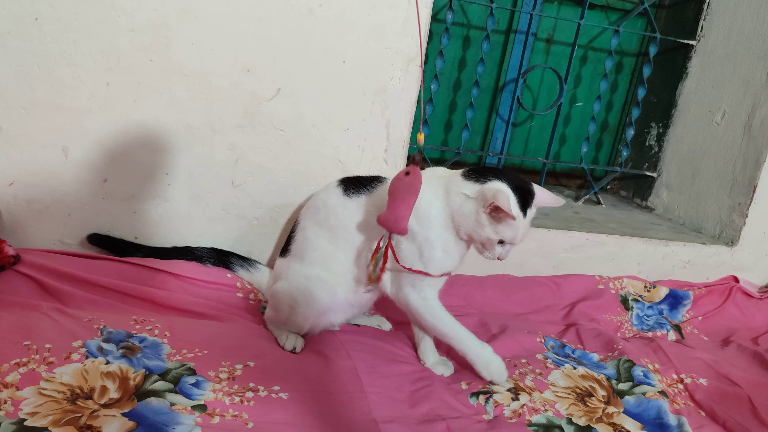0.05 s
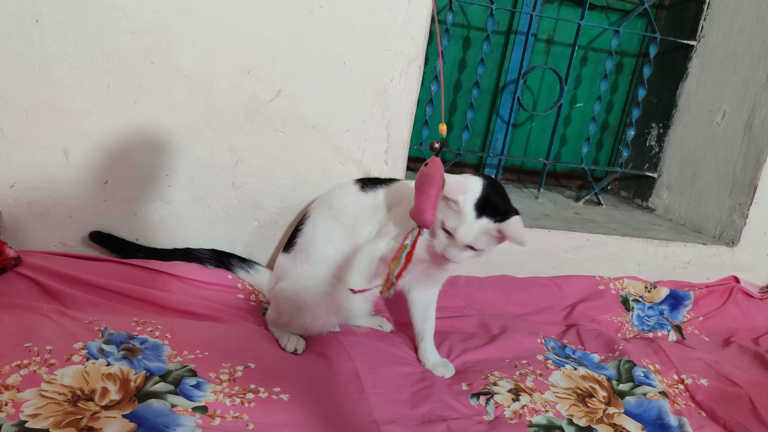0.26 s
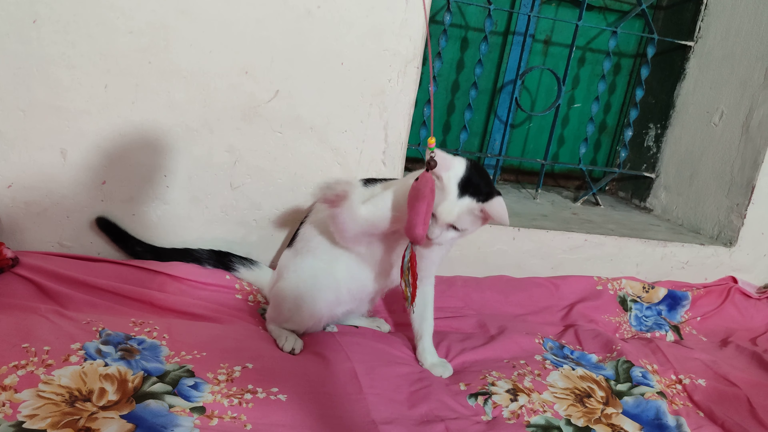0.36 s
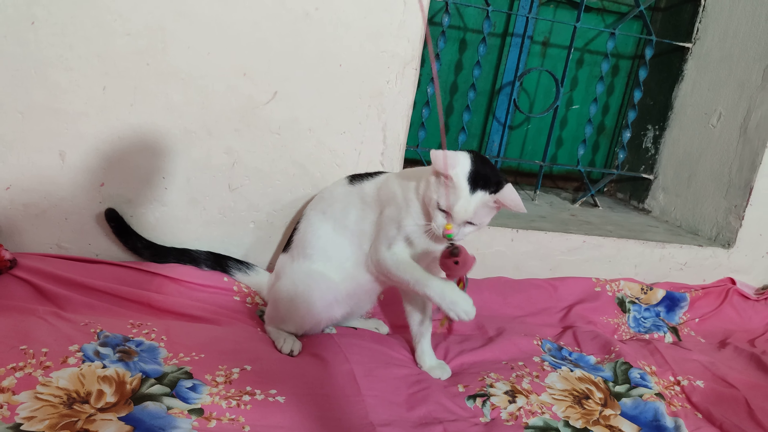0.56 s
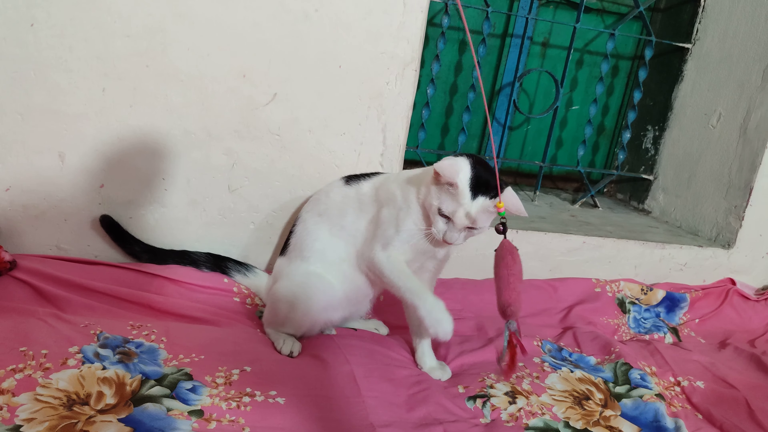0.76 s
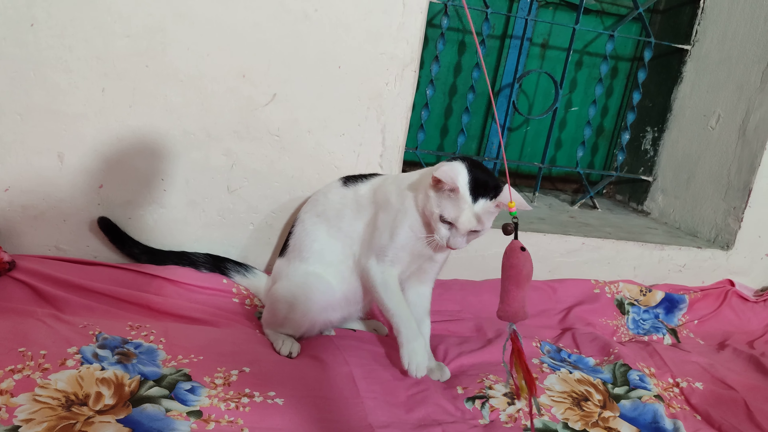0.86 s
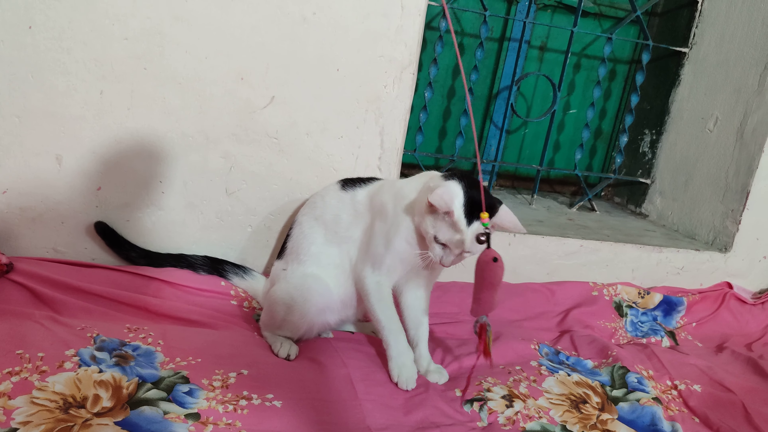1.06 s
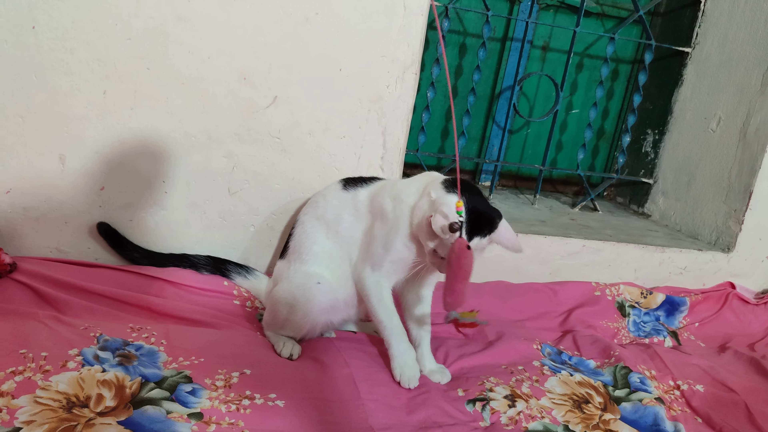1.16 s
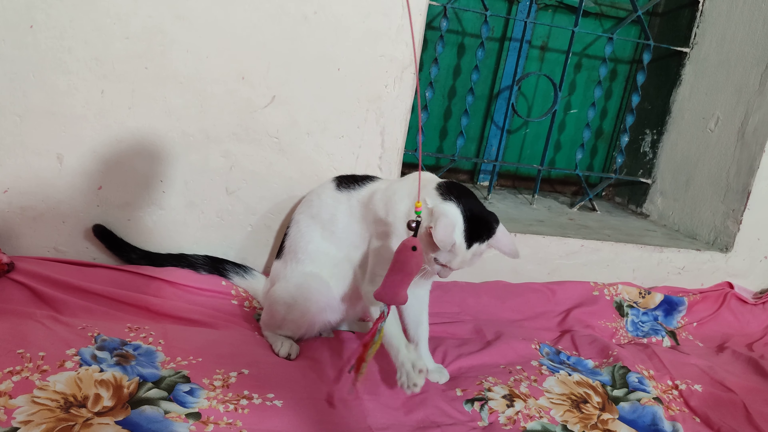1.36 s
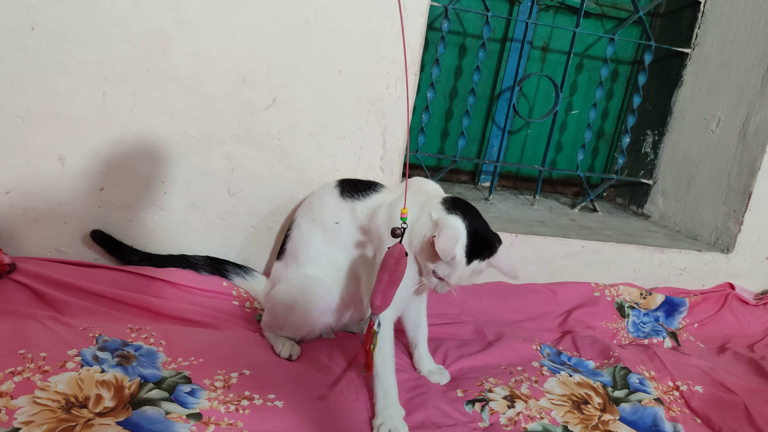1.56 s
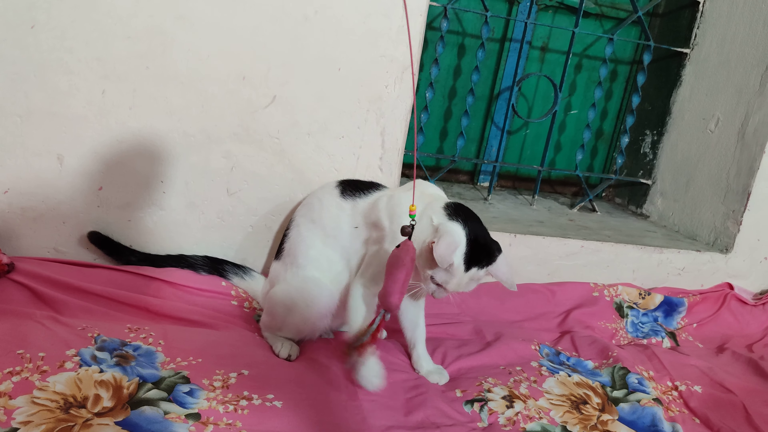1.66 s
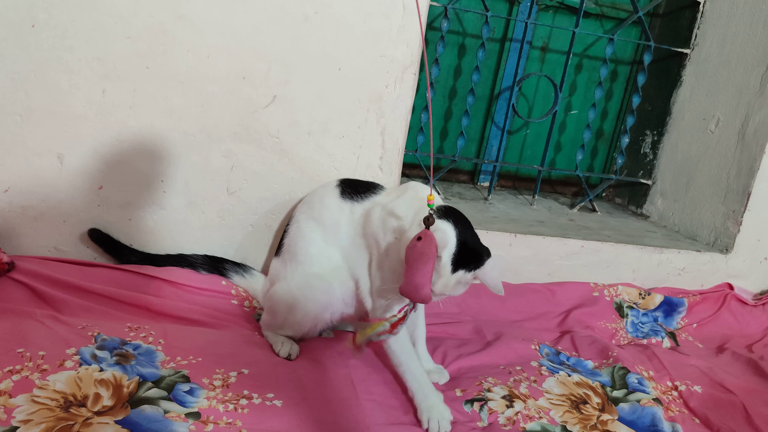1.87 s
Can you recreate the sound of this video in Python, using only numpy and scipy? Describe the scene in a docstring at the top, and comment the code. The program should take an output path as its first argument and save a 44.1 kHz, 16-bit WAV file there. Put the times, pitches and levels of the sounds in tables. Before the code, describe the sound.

A small bell on a cat toy jingles unevenly, with a soft paw tap.

```python
"""A cat paws at a bell toy

A small bell on a dangling toy jingles in a small, hard-walled room. A loose pellet hits the shell
and bounces on. The shell's two low tones are choked quickly, while its higher tones ring longer.
Two soft taps fall in between, over a low room rumble, a thin hiss and a narrow band of hiss."""
import sys
import numpy as np
from scipy import signal
from scipy.fft import rfft, irfft, next_fast_len
from scipy.io import wavfile

SR = 44100
rng = np.random.default_rng(int(sys.argv[2]) if len(sys.argv) > 2 else 0)


def store_pcm(level_fs):
    """Save levels as 16-bit WAV."""
    pcm = np.round(np.clip(level_fs, -1, 1) * 32767).astype(np.int16)
    wavfile.write(sys.argv[1], SR, np.atleast_2d(pcm).T)


N = 83790

# Levels in the tables are relative. A t60 is the time a sound takes to fade by 60 dB.
# Tone colour of the rumble, thin hiss, narrow hiss and rolling pellet: f/Hz, level/dB
RUMBLE_SPECTRUM = [(15, -10), (30, 1), (49, -1), (97, -8.5), (128, -7), (258, -17), (342, -18), (550, -24),
                   (765, -28.5), (1500, -34), (4000, -40.5), (5200, -52), (8800, -91.5)]
HISS_SPECTRUM = [(2500, -30.5), (4300, -18.5), (5000, 1), (5700, 5), (6200, -7), (6500, -3.5), (6750, 11),
                 (7250, 4), (7600, -4.5), (8700, -15.5), (10300, 1), (11500, -3), (15700, -2)]
BAND_SPECTRUM = [(8800, -29), (9500, -17), (9850, -10), (10100, -2.5), (10400, -4), (10620, 1.5),
                 (10880, 2.5), (11080, -3), (11350, -28), (12500, -41)]
ROLL_SPECTRUM = [(4400, -34.5), (5100, -15), (5400, -4.5), (5750, -18.5), (6500, -20), (9000, -42)]
# How alike the rumble is left and right: f/Hz, likeness (1 = the same)
RUMBLE_LIKENESS = [(30, .65), (130, 0.65), (280, 0.82), (600, 0.062), (2000, .05)]
# The narrow hiss over time: t/s, level/dB
BAND_LEVELS = [(0, 2), (1.11, 3.5), (1.151, -10.5), (1.22, -25.5), (1.29, -25), (1.32, -2), (1.45, -0.5),
               (1.6, 3)]
# How long the room echoes: f/Hz, t60/s
ECHO_TIMES = [(200, .25), (5400, 0.26), (14500, 0.14)]
# Soft taps of paw and toy: t/s, thump level/dB, tick level/dB
PAW_TAPS = [(0.3158, -66.5, -56), (0.6862, -36.5, -49)]
# Tones of a tap's thump and tick: f/Hz, level/dB, t60/s
THUMP_TONES = [(124, -6, 0.044), (274.5, -1, 0.0235)]
TICK_TONES = [(2192, 0, 0.011), (2890, -2.5, 0.014), (3420, -10.5, .01)]
# The low pair of tones, from the two halves of the shell: f/Hz, t60/s
LOW_TONES = [(5310, 0.031), (5460, 0.029)]
# Pellet strikes: t/s, low level/dB, middle level/dB, high level/dB, upper tone's share of the low pair
PELLET_STRIKES = [(.001, -55.5, -84, -80, 0), (0.075, -57.5, -84, -80, 0.76), (.159, -46, -80, -76, 0.25),
                  (.166, -47.5, -80, -75.5, 1), (.1878, -35, -56, -55, .9), (0.2399, -33.5, -80, -71, 0.18),
                  (.242, -34.5, -77, -57.5, 0.52), (0.2759, -37.5, -80, -79, 0), (.287, -48, -78, -72, 0.7),
                  (.349, -45.5, -60, -48, 0.2), (0.3702, -20, -72, -36, 1), (.4345, -24, -70, -50.5, 0.16),
                  (0.4454, -35, -68, -60, 0), (0.459, -37.5, -66, -62, .4), (0.4667, -35, -69, -57, 0.05),
                  (.473, -34.5, -72, -51.5, 0), (0.4987, -42.5, -63, -51.5, 0.7),
                  (0.505, -53, -68, -47, 0.97), (.53, -51, -72, -43.5, 0.6), (.545, -46.5, -73, -60, 0.8),
                  (0.5644, -34.5, -60, -39.5, 1), (0.5715, -15.5, -60, -45, 0.23),
                  (.5812, -25.5, -65, -61, 0.76), (0.596, -29, -67, -64, .9), (0.6028, -36, -72, -58, 0.05),
                  (.608, -30.5, -72.5, -61, 0.77), (0.622, -41.5, -73, -54, 0.5),
                  (.648, -36.5, -79, -75, 0.8), (.6655, -39, -80, -80.5, 0.5), (.678, -34.5, -75, -61, .6),
                  (.706, -35.5, -78, -69, 0.43), (0.758, -35, -62, -56, 1), (0.7665, -27, -71, -59, 0.91),
                  (.815, -38, -63, -43.5, 0.7), (.8668, -28, -70, -38, .84), (0.88, -27, -63, -46, 0.8),
                  (.891, -31.5, -57, -47.5, 0.8), (0.8974, -35.5, -70, -79, 1),
                  (0.9031, -37, -75, -63.5, 0.47), (0.916, -44, -71, -76, 0),
                  (0.9477, -40.5, -76, -66, 0.55), (.952, -41, -80, -75, 1), (0.956, -43, -80, -64, 0.46),
                  (1.0232, -36, -75, -69, 0.67), (1.057, -46, -75, -64, 0.8),
                  (1.095, -44.5, -76, -71, 0.66), (1.897, -42, -80, -74, 0)]

RUMBLE_DB, HISS_DB, BAND_DB, ROLL_DB = -54.5, -73, -66.5, -71.5
HISS_PAN_DB, BAND_PAN_DB, ROOM_PAN_DB, BELL_PAN_DB = 5.5, 9.5, 4.5, 7.5  # right over left
ROOM_DB, ROOM_DELAY_S = -9.5, 0.0016
ROLL_END_S = 1.15
LOW_GAIN_DB, CONTACT_S, LOW_DETUNE = 4.5, 0.00036, 0.0061  # detune: pitch scatter from hit to hit
SCRAPE_DB, SCRAPE_T60_S, SCRAPE_RISE_S = -26, 0.011, 0.002
BOUNCE_GAP_S, BOUNCE_DB, BOUNCE_LOSS_DB = 0.0051, -11, 5.5  # flight time, first level, loss per bounce
MIDDLE_HZ, MIDDLE_T60_S = 7900, 0.072
HIGH_HZ, HIGH_T60_S = 14440, 0.094
SHIMMER_GAIN_DB, SHIMMER_RISE_S, SHIMMER_DETUNE = -1.5, 0.00093, 0.003
SHIMMER_ECHO_DB = 2.5  # the higher tones beam at the walls more than at the listener
BUZZ_DEPTH, BUZZ_HZ = 0.44, 260
SIZZLE_DB, SIZZLE_T60_S, SIZZLE_FROM_HZ, SIZZLE_TO_HZ = -13.5, 0.035, 13900, 15700
SHELL_CUTOFF_HZ = 4210  # the tiny shell gives off little sound below this
LEFT_DELAY_S, TOP_HZ = 0.00002, 15900


def amp(db):
    """Turn decibels into a gain."""
    return 10 ** (np.asarray(db) / 20)


def unit(x):
    """Scale to an average power of 1."""
    return x / np.sqrt(np.mean(x ** 2) + 1e-20)


def along(points, hz):
    """Read between (f/Hz, value) points on a log frequency axis."""
    freqs, values = np.transpose(points)
    return np.interp(np.log(hz + 1), np.log(freqs + 1), values)


def pan(db):
    """Left and right gains, the right louder by db."""
    return unit(amp([[-db / 2], [db / 2]]))


def filtered(x, response):
    """Multiply each frequency in x by response(hz)."""
    size = next_fast_len(N + SR // 2)
    return irfft(rfft(x, size) * response(np.fft.rfftfreq(size, 1 / SR)), size)[..., :N]


def noise(spectrum):
    """Two unrelated noises with this tone colour."""
    return unit(filtered(rng.standard_normal((2, N)), lambda hz: amp(along(spectrum, hz))))


def add(track, start_s, sound):
    """Mix a sound into a track."""
    part = track[..., max(round(start_s * SR), 0):][..., :sound.shape[-1]]
    part += sound[..., :part.shape[-1]]


def rise(t, attack_s):
    """A soft start from 0 to 1."""
    return 1 - np.exp(-t / attack_s)


def fade(t, t60):
    """Die away by 60 dB every t60 seconds."""
    return np.exp(-np.log(1000) * t / t60)


def ring(tones, t):
    """Add up fading tones from (f/Hz, level/dB, t60/s) rows."""
    return sum(amp(db) * fade(t, t60) * np.sin(2 * np.pi * hz * t) for hz, db, t60 in tones)


def rumble():
    """The room's low rumble; its deep part is much alike in both ears."""
    def shares(hz):
        angle = np.arccos(along(RUMBLE_LIKENESS, hz)) / 2
        return np.array([np.cos(angle), np.sin(angle)])

    common, opposite = filtered(noise(RUMBLE_SPECTRUM), shares)
    return amp(RUMBLE_DB) * unit(np.array([common + opposite, common - opposite]))


def hiss():
    """A steady thin hiss, and a narrow band of hiss that drops out briefly."""
    level_db = np.interp(np.arange(N) / SR, *np.transpose(BAND_LEVELS))
    band = amp(BAND_DB + level_db) * pan(BAND_PAN_DB) * noise(BAND_SPECTRUM)
    return band + amp(HISS_DB) * pan(HISS_PAN_DB) * noise(HISS_SPECTRUM)


def room_echo(sound):
    """The echo off the walls, new for each place the swinging toy sounds from."""
    hz, t, spectra = signal.stft(rng.standard_normal((2, SR // 3)), SR, nperseg=256)
    tail = signal.istft(spectra * fade(t, along(ECHO_TIMES, hz)[:, None]), SR, nperseg=256)[1]
    tail *= np.clip(np.arange(tail.shape[1]) / SR / ROOM_DELAY_S - 1, 0, 1)  # wait, then fade in
    tail /= np.linalg.norm(tail[0])
    echo = signal.fftconvolve(sound[None], tail, axes=1)[:, :len(sound)]
    return amp(ROOM_DB) * pan(ROOM_PAN_DB) * echo


def taps():
    """Paw and toy tap softly: a dull thump with a small tick on top."""
    track, t = np.zeros((2, N)), np.arange(SR // 4) / SR
    for start_s, thump_db, tick_db in PAW_TAPS:
        tap = amp(thump_db) * ring(THUMP_TONES, t) + amp(tick_db) * ring(TICK_TONES, t)
        add(track, start_s, tap + room_echo(tap))
    return track


def rolling():
    """The pellet rolls faintly inside the shell until the toy comes to rest."""
    moving = np.clip((ROLL_END_S - np.arange(N) / SR) * 20, 0, 1)
    return amp(ROLL_DB) * moving * pan(BELL_PAN_DB) * noise(ROLL_SPECTRUM)


def contact(t, upper_share):
    """One touch of the pellet rings the two low tones and makes a short scrape."""
    detune = 1 + LOW_DETUNE * rng.standard_normal()
    pair = sum(share * fade(t, t60) * np.sin(2 * np.pi * hz * detune * t)
               for (hz, t60), share in zip(LOW_TONES, (1 - upper_share, upper_share)))
    scrape = amp(SCRAPE_DB) * fade(t, SCRAPE_T60_S) * rise(t, SCRAPE_RISE_S)
    return pair * rise(t, CONTACT_S) + scrape * rng.standard_normal(len(t))


def rattle(t, upper_share, bounces=3):
    """The pellet strikes, then bounces more weakly at uneven gaps."""
    sound, start_s = contact(t, upper_share), 0
    for bounce in range(bounces):
        start_s += BOUNCE_GAP_S * (0.5 + rng.random())
        level_db = BOUNCE_DB - BOUNCE_LOSS_DB * bounce + 2 * rng.standard_normal()
        add(sound, start_s, amp(level_db) * contact(t, rng.random()))
    return sound


def shimmer(t, middle_db, high_db):
    """The shell's middle and high tones, roughened by the buzzing pellet, with a little sizzle."""
    smooth = signal.butter(N=2, Wn=BUZZ_HZ, fs=SR, output="sos")
    bright = signal.butter(N=2, Wn=[SIZZLE_FROM_HZ, SIZZLE_TO_HZ], btype="band", fs=SR, output="sos")
    buzz = unit(signal.sosfilt(smooth, rng.standard_normal(len(t))))
    sizzle = unit(signal.sosfilt(bright, rng.standard_normal(len(t))))
    sizzle *= amp(high_db + SIZZLE_DB) * fade(t, SIZZLE_T60_S)
    detune = 1 + SHIMMER_DETUNE * rng.standard_normal()
    tones = [(MIDDLE_HZ * detune, middle_db, MIDDLE_T60_S), (HIGH_HZ * detune, high_db, HIGH_T60_S)]
    return ring(tones, t) * rise(t, SHIMMER_RISE_S) * (1 + BUZZ_DEPTH * buzz) + sizzle


def bell():
    """Every strike rings the shell, heard directly and off the walls."""
    direct, echo = np.zeros((2, N)), np.zeros((2, N))
    t = np.arange(SR // 3) / SR
    low_cut = signal.butter(N=2, Wn=SHELL_CUTOFF_HZ, btype="high", fs=SR, output="sos")
    steep_cut = np.vstack([low_cut] * 3)
    for start_s, low_db, middle_db, high_db, upper_share in PELLET_STRIKES:
        low = signal.sosfilt(steep_cut, amp(low_db + LOW_GAIN_DB) * rattle(t, upper_share))
        high = amp(SHIMMER_GAIN_DB) * shimmer(t, middle_db, high_db)
        add(direct, start_s, pan(BELL_PAN_DB) * (low + high))
        add(echo, start_s, room_echo(low + amp(SHIMMER_ECHO_DB) * high))
    ear_delays = np.array([[LEFT_DELAY_S], [0]])
    return echo + filtered(direct, lambda hz: np.exp(-2j * np.pi * hz * ear_delays))


def scene():
    """The bell and taps over rumble and hiss."""
    return bell() + rolling() + taps() + rumble() + hiss()


def record(dry):
    """The microphone keeps nothing above TOP_HZ."""
    return filtered(dry, lambda hz: hz < TOP_HZ)


dry = scene()
out = record(dry)
store_pcm(out)
```